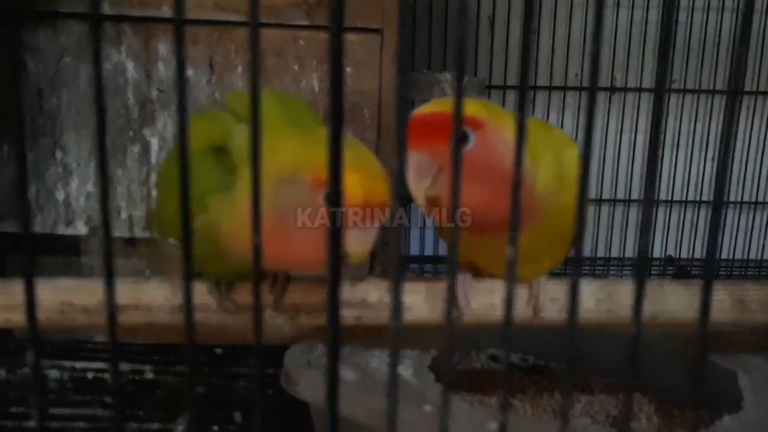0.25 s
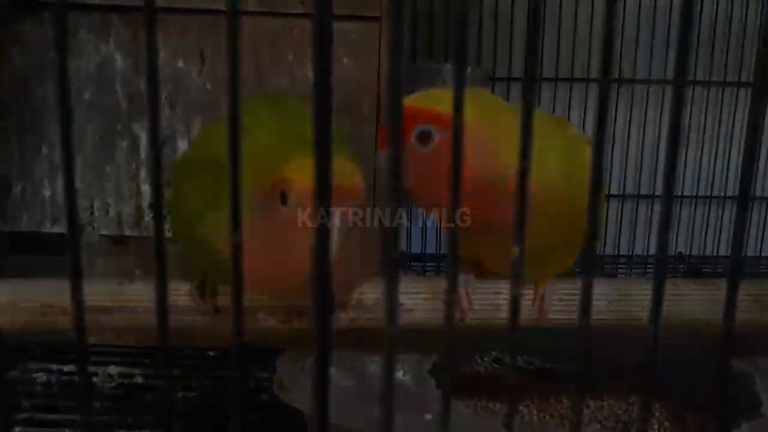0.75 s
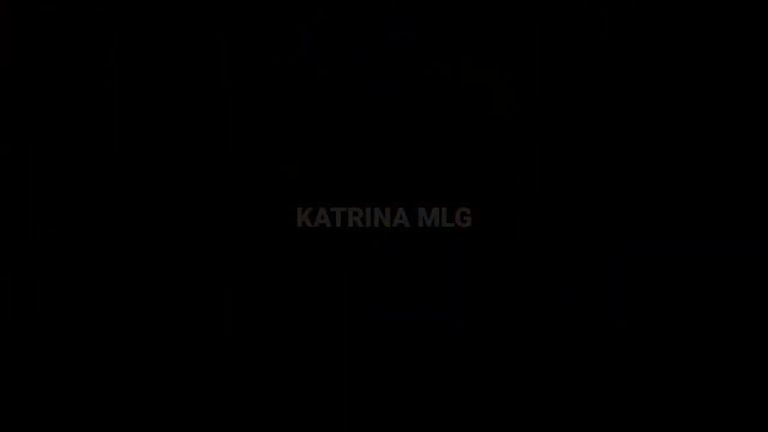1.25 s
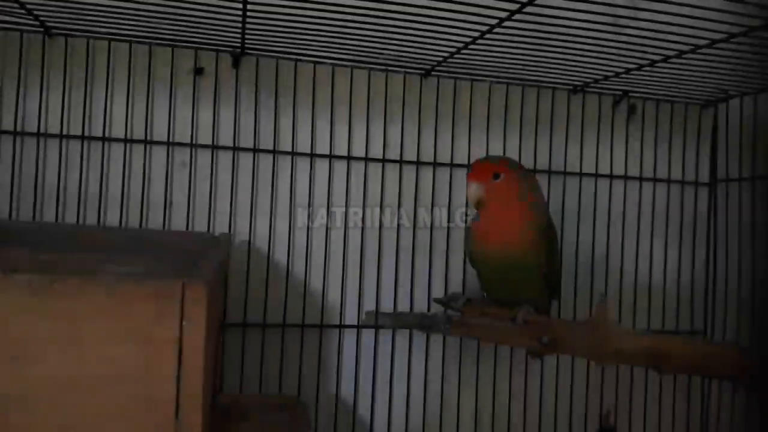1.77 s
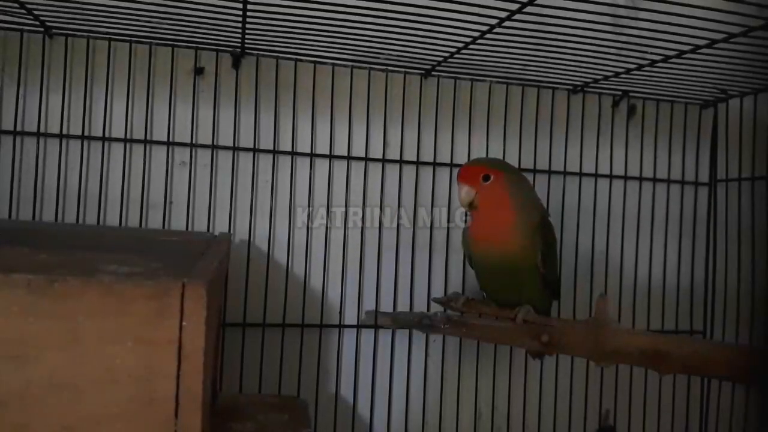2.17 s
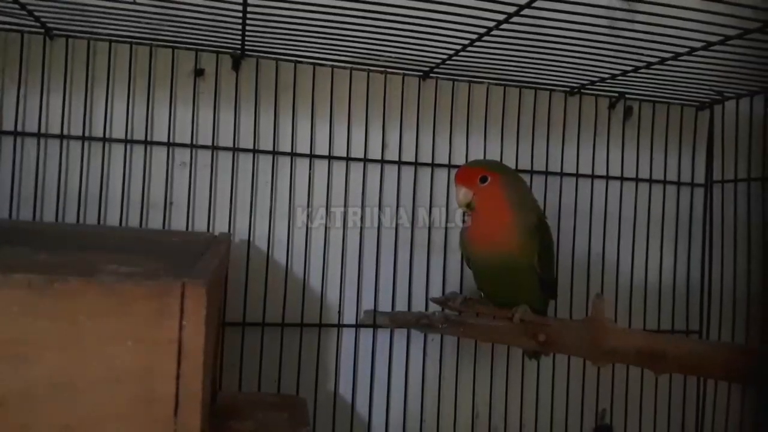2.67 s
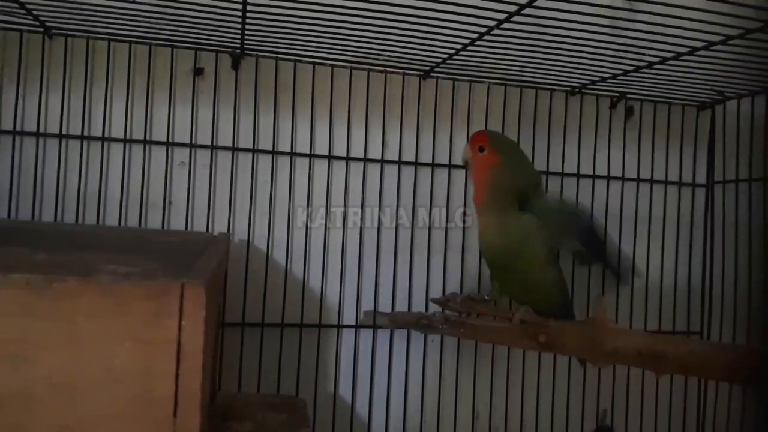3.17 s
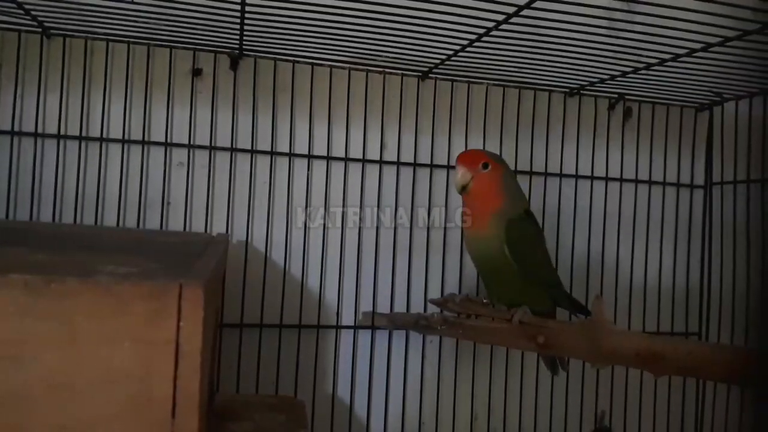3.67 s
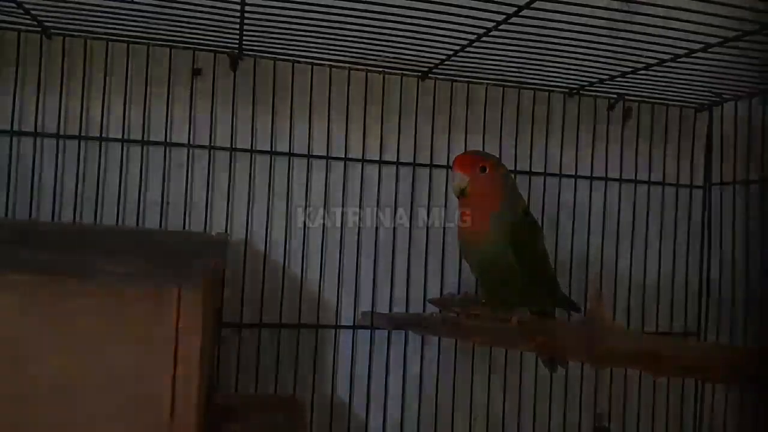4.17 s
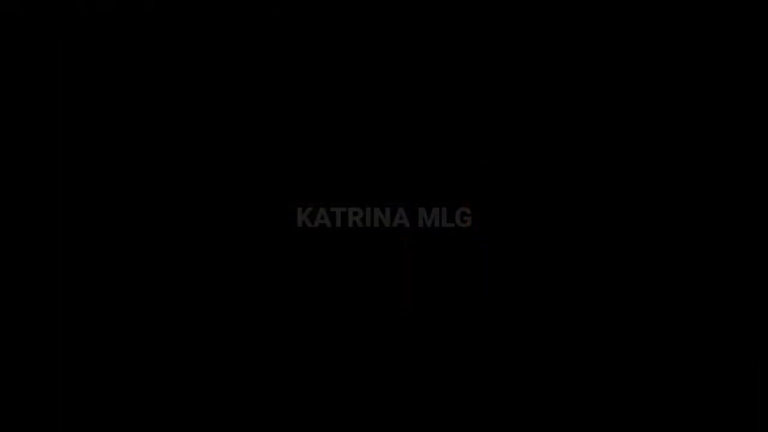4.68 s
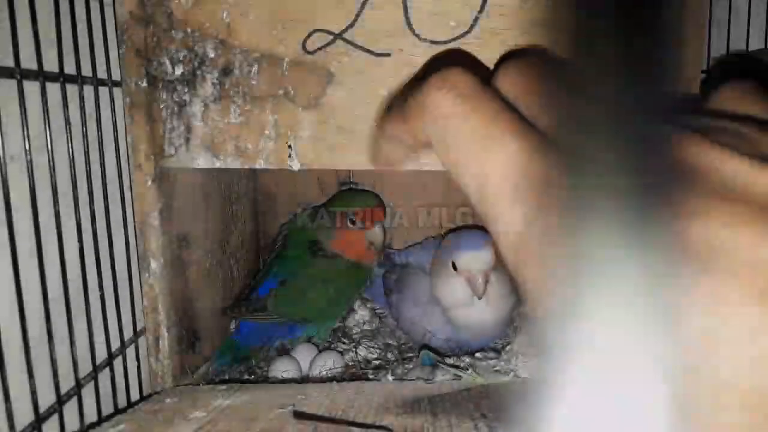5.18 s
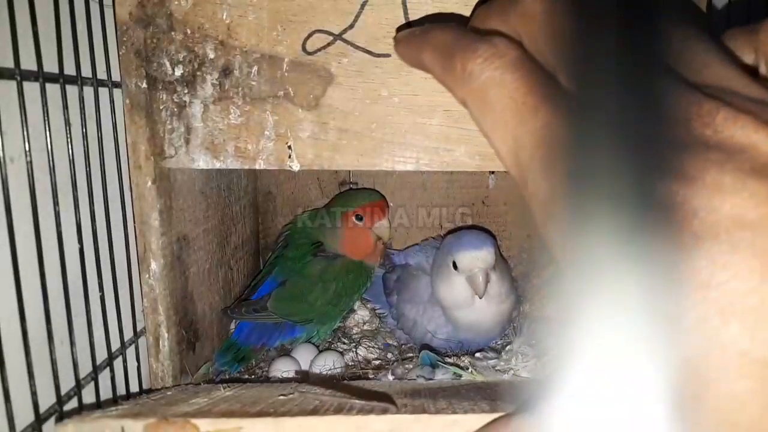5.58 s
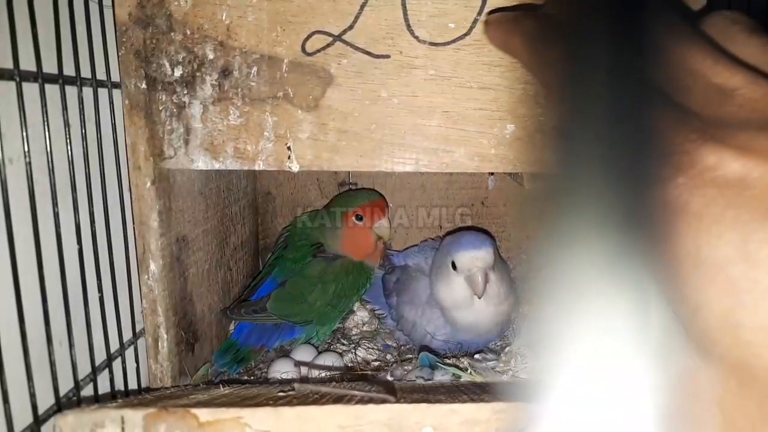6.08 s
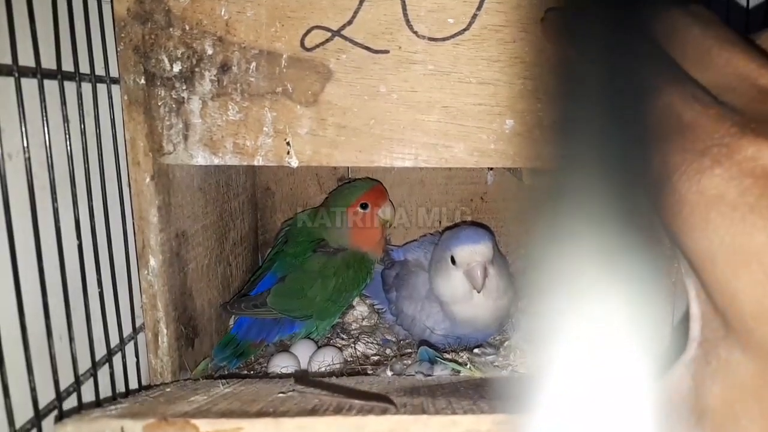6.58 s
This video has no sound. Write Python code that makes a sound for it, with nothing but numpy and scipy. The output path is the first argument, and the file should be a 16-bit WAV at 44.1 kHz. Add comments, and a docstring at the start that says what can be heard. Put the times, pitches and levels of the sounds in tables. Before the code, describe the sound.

In a small, hard-walled aviary, distant birds whistle and twitter faintly over a low rumble. Close lovebirds give single arching chirps, some clean, some raspy, with soft perch bumps. Around three seconds one screams loudly in broken held notes, wings puffing dully. After a near-silent gap, rougher chirps follow, then the far flock answers faintly. Sound sits strongly left, with a weak right channel and microphone hiss.

```python
"""A small, hard-walled aviary, heard mostly in the left channel: far birds whistle and twitter over a low rumble.
Then lovebirds close by chirp in arches of pitch, swinging partials that flip from clean whistle to harsh rasp.
Scuffs on perch and cage ring briefly; one bird screams in held notes and beats its wings in dull puffs of air.
The background dips from the scream until the next near chirps, which a thin peep leads in.
After the last near chirp the far flock answers again, through its echoes only, to the end."""
import sys
import numpy as np
from scipy import signal
from scipy.fft import rfft, irfft, next_fast_len
from scipy.io import wavfile

SR = 44100
rng = np.random.default_rng(int(sys.argv[2]) if len(sys.argv) > 2 else 0)


def generate_wav(sig):
    """Save sig (samples, or channels by samples) to the path in sys.argv[1] as 16-bit PCM at SR."""
    pcm = np.round(np.clip(np.atleast_2d(sig).T, -1, 1) * 32767).astype(np.int16)
    wavfile.write(sys.argv[1], SR, pcm)


N = 301555
TIME = np.arange(N) / SR
EDGE_HZ = 15900  # upper limit of the sound
SOFT_START_DB = -12  # near chirps and peeps start this much softer


def amp(db):
    """Decibels to gain."""
    return 10 ** (np.asarray(db) / 20)


def unit(x):
    """Scales to an rms of one."""
    return x / np.sqrt(np.mean(x ** 2) + 1e-20)


def read(points, hz):
    """Reads a table on a log-frequency axis."""
    f, value = np.transpose(points)
    return np.interp(np.log(hz + 1), np.log(f), value)


def shaped(x, gain):
    """Filters by a function from frequency to gain."""
    length = x.shape[-1]
    size = next_fast_len(length + 512)
    spectrum = rfft(x, size) * gain(np.fft.rfftfreq(size, 1 / SR))
    return irfft(spectrum, size)[..., :length]


def noise(spectrum, shape):
    """Noise of unit rms with a given spectrum."""
    return unit(shaped(rng.standard_normal(shape), lambda f: amp(read(spectrum, f))))


def wander(length, hz):
    """Random motion of unit rms up to a given rate."""
    return unit(shaped(rng.standard_normal(length), lambda f: 1 / (1 + (f / hz) ** 4)))


def add(mix, s, sound):
    """Mixes a sound in at a time."""
    part = mix[..., max(round(s * SR), 0):][..., :sound.shape[-1]]
    part += sound[..., :part.shape[-1]]


def near_birds(right_direct=0.23, right_lag_s=.0007, last_stop_s=5.551):
    """Every call arrives directly, a little later on the right, and by its distance through the room."""
    # chirps: start t/s, room against direct level/dB, arch, slur, colour, where
    # arch = (length t/s, scoop time t/s, top f/Hz, droop f/Hz, level/dB, swell level/dB, roughness 0-1)
    # slur = (length t/s, first f/Hz, last f/Hz, level/dB, roughness 0-1)
    # colour = (partial 1 level/dB, partial 3 level/dB, shift of partials 4 to 7 level/dB), before call_colour
    chirps = [ (.791, 3, (.105, .014, 2420, 290, -21, 1, .09), (.022, 2080, 1980, -21, .17),
              (-10.5, -7.5, -2)), (1.213, 10, (.119, .018, 2520, 90, -30.3, 3, .09),
              (.024, 2200, 2160, -28, .25), (-5.5, -9.5, 2.5)),
              (1.523, 5, (.132, .022, 2510, 10, -26.5, 0, .2), (.034, 2340, 2230, -24, .85), (-5, -7, 1.5)),
              (2.701, -6, (.159, .028, 2330, 80, -20, 1, .38), (.052, 2540, 2330, -23, .6), (-5.5, -5, -4)),
              (4.251, -1, (.134, .027, 2370, 0, -28, 2, .41), (.022, 2490, 2380, -28, .68),
              (-8, -4.5, 2.5)), (4.601, 2, (.103, .033, 2400, 0, -24.5, 2, .31),
              (.1, 2590, 2480, -26.5, .76), (-8, -4, 2)), (4.966, -2.5, (.192, .014, 2460, 0, -31, -7, .74),
              (.048, 2400, 2200, -33.5, .7), (-8, -3.5, 2)),
              (5.335, -3, (.138, .03, 2290, 0, -43.5, -7, .58), (.066, 2050, 2340, -48, .5),
              (-7, -2.5, 1.5)), ]
    # thin peeps: start t/s, length t/s, first f/Hz, last f/Hz, level/dB, roughness 0-1,
    # partial 2 level/dB before call_colour, room against direct level/dB
    peeps = [(2.031, .038, 3740, 3590, -42.5, .3, -8, 2), (4.184, .033, 5520, 5240, -38.5, .15, -11.5, 3),
             (4.179, .042, 6600, 6420, -45, .22, -22, 1)]
    # held notes: first a steady tone under the harsh fourth chirp, then the scream:
    # start t/s, length t/s, first f/Hz, last f/Hz, level/dB, roughness 0-1,
    # room against direct level/dB, then as the colour of a chirp
    held_notes = [ (2.724, .16, 2215, 2185, -29, .12, -1, -6, 8, 5),
                  (2.984, .012, 2300, 2650, -18, .85, -12, -14, -7, -2),
                  (2.994, .05, 2478, 2452, -14, .04, -14, -17, -15, -6.5),
                  (3.042, .014, 2570, 2470, -18, .3, -12, -17, -6, -1),
                  (3.053, .038, 2182, 2162, -16.5, .04, -8, 8, 31, 23),
                  (3.086, .085, 2630, 2400, -21.5, .66, -4, -12.5, -7.5, -1),
                  (3.239, .009, 2040, 2100, -15.5, .8, 2, -8, -1, -1),
                  (3.246, .029, 2190, 2280, -19.5, .08, 2.5, -6, 0, 2),
                  (3.274, .077, 2066, 2092, -19, .025, -10, -14, 1, 1),
                  (3.349, .016, 3000, 2920, -18, .55, -4.5, -23, -19, -7),
                  (3.364, .025, 2640, 2470, -24.5, .85, -4.5, -17, -17, -6), ]
    calls = [(s, room_db, chirp(*shape)) for s, room_db, *shape in chirps]
    calls += [(s, room_db, peep(*shape)) for s, *shape, room_db in peeps]
    for s, length, first_hz, last_hz, db, rough, room_db, *colour in held_notes:
        calls.append((s, room_db, held_note(length, first_hz, last_hz, db, rough, *colour)))
    direct, send = np.zeros((2, N))
    for s, room_db, sound in calls:
        share = 1 / np.hypot(1, amp(room_db))  # both paths share the level
        add(direct, s, share * sound)
        add(send, s, share * amp(room_db) * sound)
    right = right_direct * shaped(direct, lambda f: np.exp(-2j * np.pi * f * right_lag_s))
    stop = np.clip((last_stop_s - TIME) / .003, 0, 1)  # the last chirp stops short, echoes and all
    return (np.array([direct, right]) + room(send)) * stop


def chirp(arch, slur, colour, start_rough=.7, settle_s=.012, attack_s=.014, scoop=.23, break_s=.007):
    """The voice starts chaotic, scoops up towards its top pitch, droops, then breaks into a fading slur."""
    arch_s, scoop_s, top_hz, droop_hz, db, swell_db, arch_rough = arch
    slur_s, first_hz, last_hz, slur_db, slur_rough = slur
    first_db, third_db, overtones_db = colour
    high_partials_db = [-15, -14.5, -20.5, -30]  # partials 4 to 7: level/dB, before the shift
    t = np.arange(0, arch_s + slur_s, 1 / SR)
    u = np.minimum(t / arch_s, 1)  # progress through the arch
    v = np.maximum(t - arch_s, 0) / slur_s  # progress through the slur

    # the high power keeps the droop to the end of the arch
    arch_hz = top_hz * (1 - scoop * np.exp(-t / scoop_s)) - droop_hz * u ** 8
    arch_db = db + swell_db * (u - .5) + SOFT_START_DB * np.exp(-t / attack_s)
    before = [arch_hz, arch_db, arch_rough + start_rough * np.exp(-t / settle_s)]
    after = [first_hz + (last_hz - first_hz) * v, slur_db - 14 * v ** 2, slur_rough]

    broken = np.clip((t - arch_s) / break_s + .5, 0, 1)  # the voice flips from arch to slur
    pitch, level_db, rough = (a + broken * (b - a) for a, b in zip(before, after))
    partials_db = [first_db - 4 * broken, 0, third_db]  # partial 1 is weaker in the slur
    partials_db += [p + overtones_db for p in high_partials_db]
    return note(pitch, level_db, rough, partials_db)


def held_note(length, first_hz, last_hz, db, rough, first_db, third_db, overtones_db, ends_db=-3):
    """One held note, gliding evenly and a little weaker at both ends."""
    high_partials_db = [-14.5, -18, -18, -17.5]  # partials 4 to 7: level/dB, before the shift
    u = np.linspace(0, 1, round(length * SR))
    pitch = first_hz + (last_hz - first_hz) * u
    partials_db = [first_db, 0, third_db] + [p + overtones_db for p in high_partials_db]
    return note(pitch, db + ends_db * (2 * u - 1) ** 2, rough, partials_db)


def peep(length, first_hz, last_hz, db, rough, second_db, rise_s=.003, fade_db=-10):
    """A short falling note dies away from a quick attack; its partials weaken by equal steps."""
    u = np.linspace(0, 1, round(length * SR))
    pitch = first_hz + (last_hz - first_hz) * u
    level_db = db + fade_db * u + SOFT_START_DB * np.exp(-u * length / rise_s)
    return note(pitch, level_db, rough, [0, second_db, 2 * second_db])


def note(pitch, level_db, rough, partials_db, jitter=.065, jitter_hz=450, hoarse=1.25, spread_hz=210,
         rasp_db=-14, ramp_s=.0015):
    """The syrinx swings at one pitch; roughness shakes its rate, smears each partial and lets air hiss through."""
    call_colour = [(1300, -9), (1900, -10.5), (2650, 4), (3100, -6), (3700, -2), (4800, 2), (7100, -1.5),
                   (8300, -13), (9300, -7), (13000, 7), (14600, -1.5), (15800, -13)]  # colour of the near calls: f/Hz, level/dB
    rasp = [(100, -11.5), (400, -10.5), (1200, -9.5), (2200, -3.5), (3100, 4), (5000, 1), (7000, -4),
            (8300, -10), (10000, -8), (13000, -8), (15000, -6.5), (16000, -17)]  # relative spectrum of the hiss of air in a rasp: f/Hz, level/dB per Hz
    t = np.arange(len(pitch)) / SR
    rough = np.clip(rough, 0, 1.3)
    shaken = pitch * (1 + jitter * rough * wander(len(t), jitter_hz))
    phase = 2 * np.pi * np.cumsum(shaken) / SR
    depth, tone = hoarse * rough, 0
    for k, db in enumerate(partials_db, 1):
        # irregular cycles put a skirt of noise round the partial
        skirt = shaped(rng.standard_normal((2, len(t))), lambda f: (1 + (f / (2 * spread_hz)) ** 2) ** -2)
        a, b = depth * unit(skirt)
        partial = (1 + a) * np.sin(k * phase) + b * np.cos(k * phase)
        partial /= np.sqrt(1 + 2 * depth ** 2)
        tone = tone + amp(db) * (k * pitch < SR / 2) * partial
    tone = unit(shaped(tone, lambda f: amp(read(call_colour, f))))
    voice = tone + amp(rasp_db) * rough ** 2 * noise(rasp, len(t))  # only a harsh voice hisses
    ramps = np.clip(np.minimum(t, t[-1] - t) / ramp_s, 0, 1)
    return amp(level_db) * voice * ramps


def wings(grain=.45, grain_hz=500):
    """Each beat swells quickly and dies away as a dull puff, made grainy by the feathers."""
    beats = [(3.005, -45, 0.011, 0.078), (3.05, -23, 0.0088, 0.0091), (3.072, -31, 0.0091, 0.0082),
             (3.125, -52.5, 0.011, 0.018), (3.277, -38.5, .008, .014), (3.32, -40.5, 0.011, 0.026),
             (3.355, -31, 0.012, 0.0075)]  # puffs of air: peak t/s, level/dB, rise t/s, decay t/s
    puff = [(25, -34), (60, -9), (130, 4), (300, 0), (520, -3), (750, -1), (1300, -6), (2500, -10),
            (6000, -17), (16000, -28)]  # relative spectrum of a puff: f/Hz, level/dB per Hz
    power = 0
    for s, db, rise, decay in beats:
        fall = np.where(TIME < s, ((TIME - s) / rise) ** 2 / 2, (TIME - s) / decay)
        power = power + amp(db) ** 2 * np.exp(-2 * fall)
    feathers = unit(np.exp(grain * wander(N, grain_hz)))
    left = np.sqrt(power) * feathers * noise(puff, N)
    return np.array([left, np.zeros(N)])  # the draught hits only the left microphone


def bumps(rise_s=0.0045, right_db=-11):
    """Bumps and scrapes on perch, box and cage, and a brief rustle near the end, are short scuffs that excite
    one resonance each."""
    # start t/s, level/dB on the left, resonance f/Hz, width f/Hz, decay t/s
    scuffs = [(.765, -65.5, 367, 90, .045), (1.767, -60, 1100, 900, .03), (1.96, -76, 1750, 300, .029),
              (2.035, -69, 1500, 2000, .04), (2.14, -71.5, 473, 198, .041), (2.415, -66, 3500, 5000, .06),
              (2.477, -53, 460, 101, .034), (2.485, -69, 1100, 1500, .08), (2.552, -63, 4200, 3500, .05),
              (4.55, -66.5, 260, 250, .15), (5.19, -69.5, 360, 400, .33), (5.2, -72.5, 842, 100, .088),
              (5.38, -73.5, 1150, 80, .17), (6.4, -77.5, 2000, 2195, .1), (6.63, -65, 340, 1000, .09),
              (6.72, -66, 700, 2040, .047), (6.77, -59.5, 236, 400, .1)]
    out, t = np.zeros((2, N)), np.arange(SR) / SR
    for s, db, hz, width, decay in scuffs:
        scrape = rng.standard_normal((2, SR))
        ring = unit(shaped(scrape, lambda f: 1 / (1 + (2 * (f - hz) / width) ** 2) ** 2))
        swell = (1 - np.exp(-t / rise_s)) ** 2 * np.exp(-t / decay)
        add(out, s, amp(db) * ring * swell / swell.max())
    return out * amp([[0], [right_db]])


def far_birds(second_db=-3, twitters_per_s=30, twitter_s=.12, twitter_rough=.7, low_hz=4700, high_hz=6300):
    """Single whistles and random chatter, of which only the echoes arrive, some of them scattered twice."""
    # clearer whistles: start t/s, length t/s, pitch f/Hz, level/dB, roughness 0-1
    whistles = [(.19, .27, 6160, -64.5, .36), (.245, .12, 4290, -57, .2), (.279, .06, 4270, -52, .25),
                (.3, .17, 3920, -57, .22), (.316, .13, 4200, -55.5, .87), (.326, .13, 3090, -69, .25),
                (.44, .14, 3930, -64.5, .2), (.616, .13, 6300, -73, .35), (3.728, .07, 4880, -86, .2),
                (5.563, .115, 4920, -72.5, .18), (5.776, .15, 4510, -74.5, .22),
                (5.894, .11, 6550, -74.5, .15), (6.02, .15, 6520, -71.5, .24),
                (6.03, .09, 4150, -74.5, .39), (6.207, .13, 6400, -74, .25), (6.704, .19, 4930, -69, .2),
                (6.748, .16, 4040, -63, .52), (6.777, .09, 3050, -70.5, .35)]
    # spells of chatter from the distant flock: start t/s, end t/s, one twitter level/dB
    chatter = [(.17, .68, -73), (.66, .85, -79), (5.63, 6.22, -81.5), (6.72, 6.84, -75)]
    send = np.zeros(N)
    for s, *shape in whistles:
        add(send, s, whistle(*shape))
    for start, end, db in chatter:
        for s in np.arange(start, end, 1 / twitters_per_s):
            delay, height = rng.random(2)
            hz = low_hz + height * (high_hz - low_hz)
            add(send, s + .5 * delay / twitters_per_s, whistle(twitter_s, hz, db, twitter_rough))
    twice = amp(second_db) * room(send)[0]
    return room(send + twice) / np.hypot(1, amp(second_db))


def whistle(length, hz, db, rough, jitter=.07, jitter_hz=450, taper=.25, fall=.025, third_db=-21):
    """A thin whistle sinks by a small share of its pitch, with a faint third partial if the band has room."""
    size = round(length * SR)
    glide = 1 + fall * np.linspace(.5, -.5, size)
    pitch = hz * glide * (1 + jitter * rough * wander(size, jitter_hz))
    phase = 2 * np.pi * np.cumsum(pitch) / SR
    tone = np.sin(phase) + amp(third_db) * (3 * hz < EDGE_HZ) * np.sin(3 * phase)
    return amp(db) * unit(tone * signal.windows.tukey(size, taper))


def room(x, gap_s=0.001):
    """Dense echoes from near walls, other ones for each channel, fade at a rate set by frequency."""
    t60 = [(200, 0.085), (2300, 0.21), (4800, 0.22), (8000, .22), (13000, 0.17)]  # time for the echoes to fall by 60 dB: f/Hz, t/s
    t = np.arange(SR // 2) / SR
    struck = rng.random((2, len(t))) < .1  # about one sample in ten holds an echo
    taps = rng.standard_normal((2, len(t))) * struck * (t > gap_s)
    hz, when, z = signal.stft(taps, SR, nperseg=256)
    decay = 1000 ** (-when / read(t60, hz)[:, None])
    tail = signal.istft(z * decay, SR, nperseg=256)[1]
    tail /= np.linalg.norm(tail, axis=1, keepdims=True)
    return signal.fftconvolve(x[None], tail, axes=1)[:, :N]


def background(rumble_db=1, air_db=-17.5):
    """Low rumble and faint airy hiss are noises that swell and sink together."""
    rumble_spectrum = [(15, -57), (25, -25.5), (86, -3.5), (102, -1.5), (200, -11), (243, -19),
                       (459, -22.5), (624, -29.5), (1070, -28.5), (1380, -34), (2500, -38), (3250, -69),
                       (5500, -120)]  # relative spectrum of the rumble: f/Hz, level/dB per Hz
    swell = [(0, -69), (.4, -66), (.72, -73), (1.5, -76.5), (2.44, -72), (3.4, -72.5), (4.05, -76),
             (4.72, -73), (4.95, -78), (5.46, -70), (6.2, -68), (6.84, -66)]  # common level, before the two offsets and the dip: t/s, level/dB
    air_spectrum = [(1000, -5.5), (3000, 7.5), (6500, 4), (9000, -1), (15000, -6.5)]  # relative spectrum of the airy hiss: f/Hz, level/dB per Hz
    level = amp(np.interp(TIME, *np.transpose(swell))) * dip()
    rumble = noise(rumble_spectrum, (2, N))
    rumble = shaped(rumble, lambda f: f / np.hypot(f, 45))  # the microphone loses the deepest bass
    return level * (amp(rumble_db) * rumble + amp(air_db) * noise(air_spectrum, (2, N)))


def dip(start_s=2.98, end_s=4.3, depth_db=-15, edge_s=.12):
    """Gain of the background, which sinks from the scream until the next chirps."""
    inside = np.minimum(TIME - start_s, end_s - TIME)
    return amp(depth_db * np.clip(inside / edge_s, 0, 1))


def scene():
    """Birds, wings, cage and background, before the gain of each channel."""
    return near_birds() + wings() + bumps() + far_birds() + background()


def record(dry, hiss_db=-75.5, ceiling=.95):
    """A weak right channel, microphone hiss that dips too, a soft ceiling on loud peaks, and the band limit."""
    channel_db = [8.5, -9.8]  # gain of left and right: level/dB
    hiss_spectrum = [(30, 12), (100, 17), (250, 10), (500, 7), (1000, 4.5), (2000, 2.5), (4000, .5),
                     (7000, -1), (15000, 0)]  # relative spectrum of the microphone hiss: f/Hz, level/dB per Hz
    hiss = amp(hiss_db) * dip() * noise(hiss_spectrum, (2, N))
    x = dry * amp(channel_db)[:, None] + hiss
    held = x / (1 + (x / ceiling) ** 6) ** (1 / 6)
    low_pass = signal.firwin(301, EDGE_HZ, window=("kaiser", 9), fs=SR)
    return signal.oaconvolve(held, low_pass[None], "same")


dry = scene()
out = record(dry)
generate_wav(out)
```